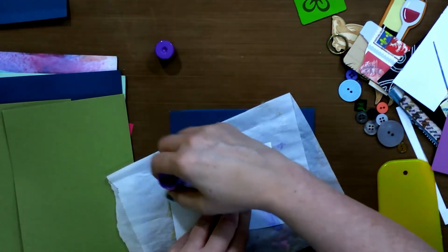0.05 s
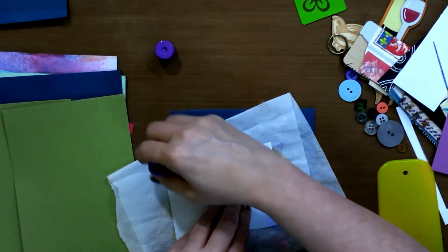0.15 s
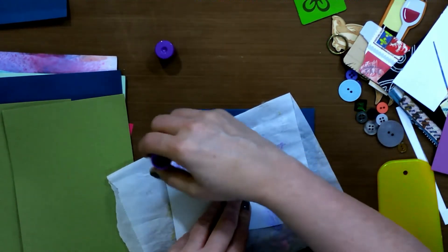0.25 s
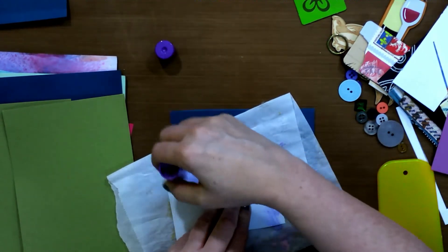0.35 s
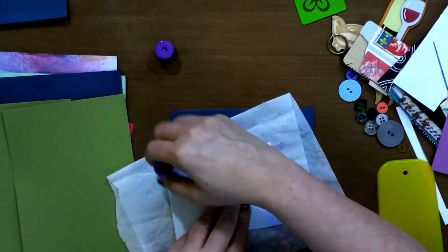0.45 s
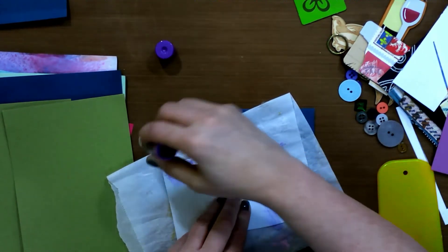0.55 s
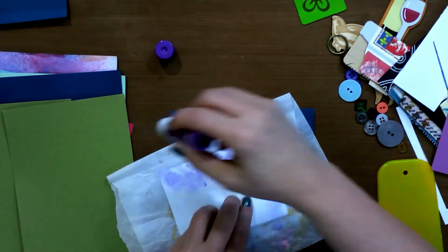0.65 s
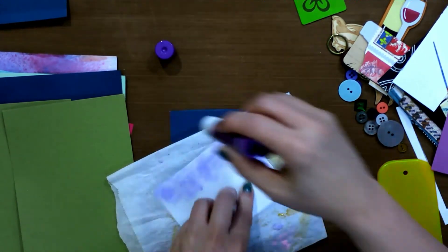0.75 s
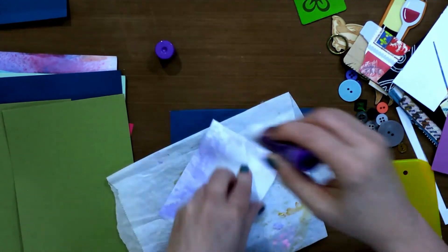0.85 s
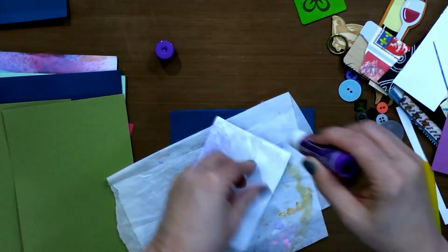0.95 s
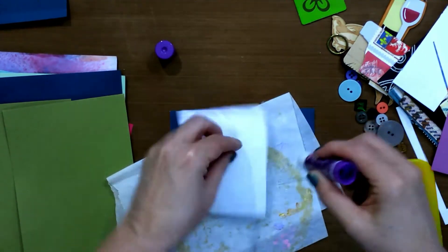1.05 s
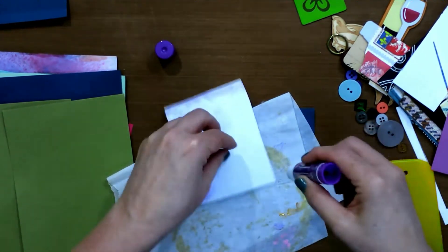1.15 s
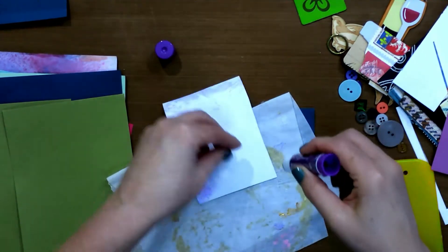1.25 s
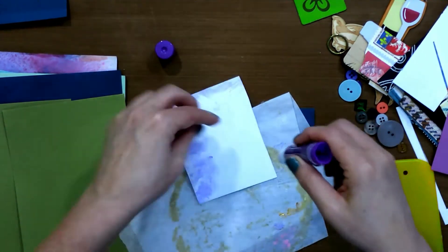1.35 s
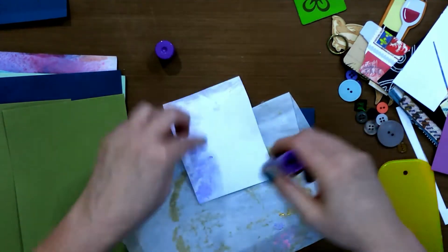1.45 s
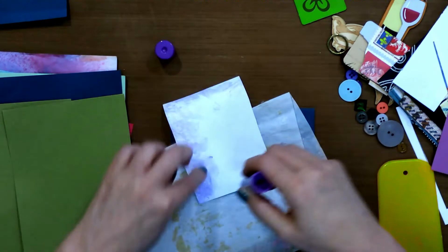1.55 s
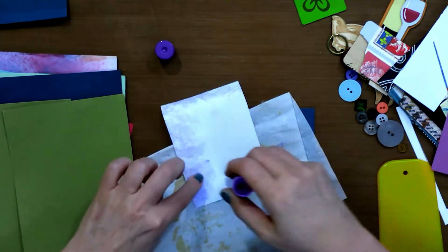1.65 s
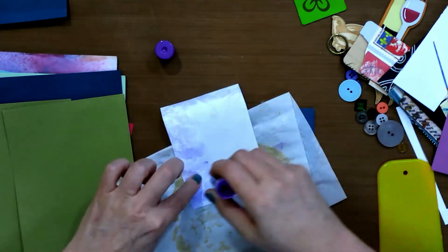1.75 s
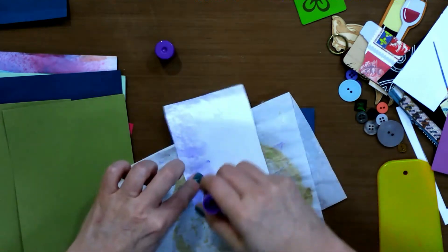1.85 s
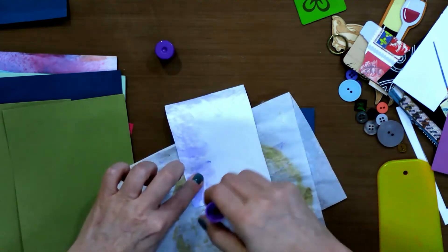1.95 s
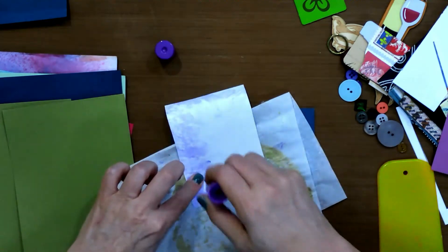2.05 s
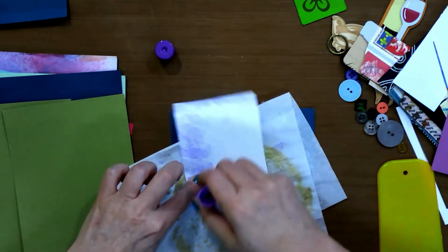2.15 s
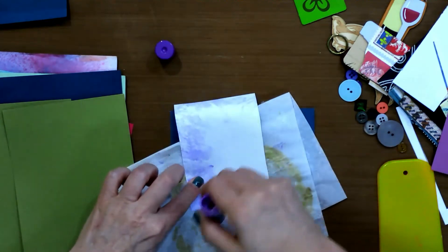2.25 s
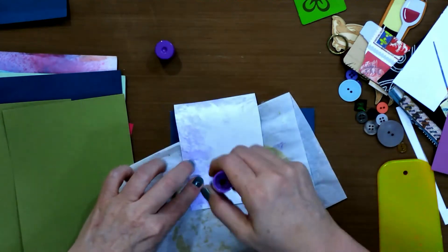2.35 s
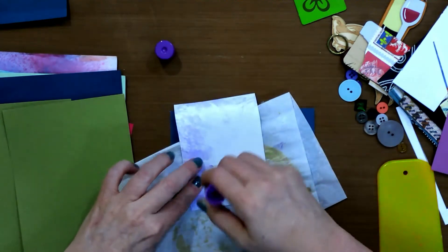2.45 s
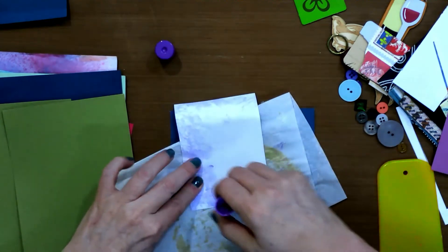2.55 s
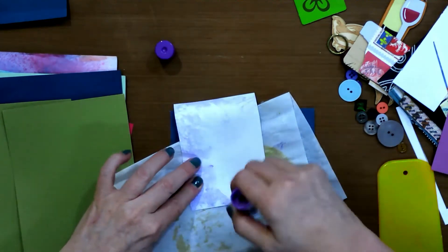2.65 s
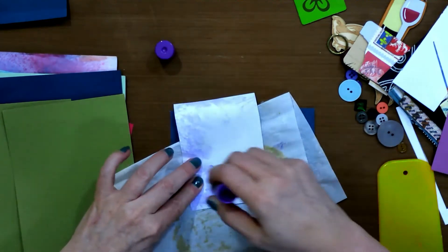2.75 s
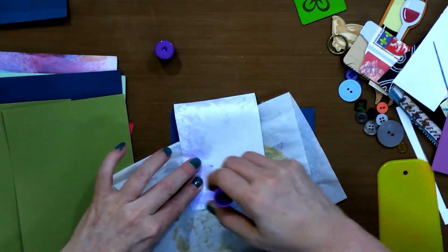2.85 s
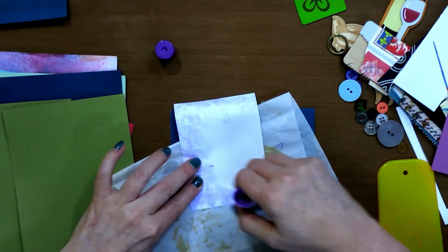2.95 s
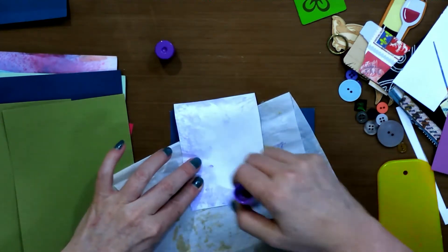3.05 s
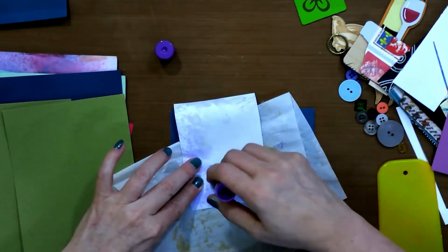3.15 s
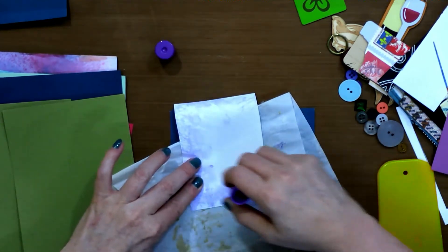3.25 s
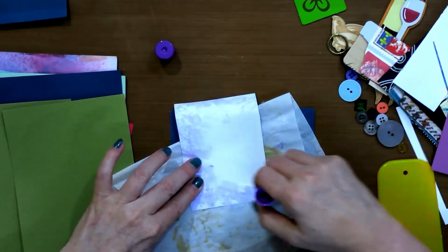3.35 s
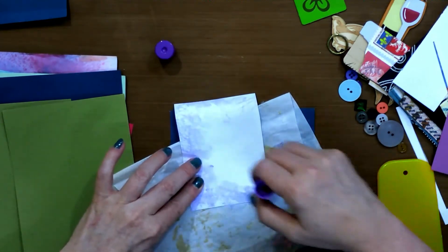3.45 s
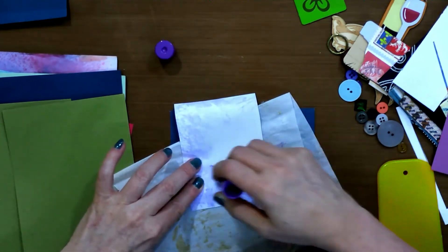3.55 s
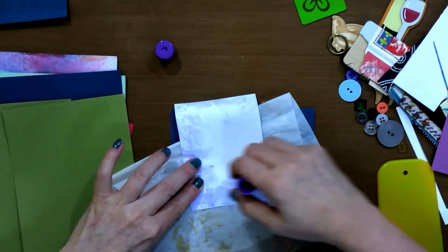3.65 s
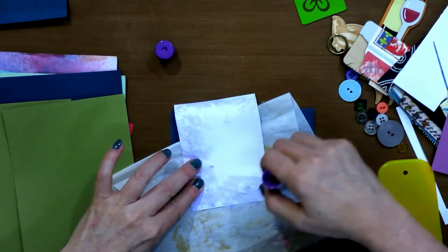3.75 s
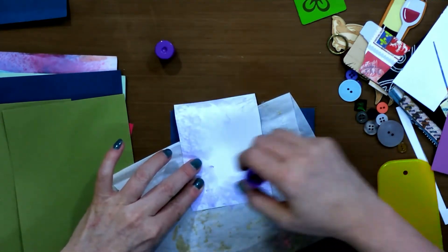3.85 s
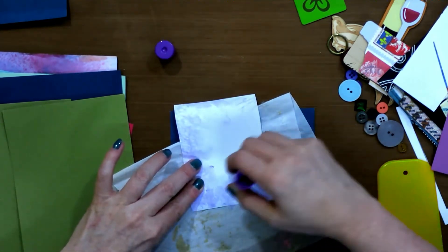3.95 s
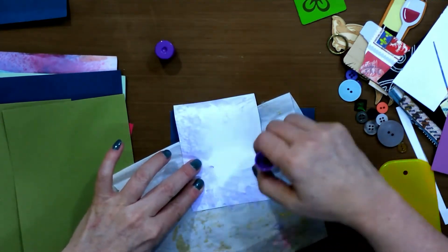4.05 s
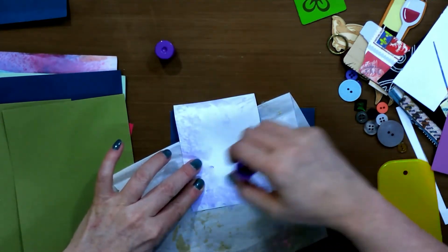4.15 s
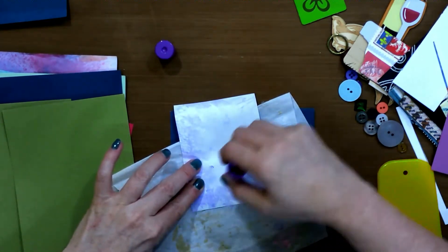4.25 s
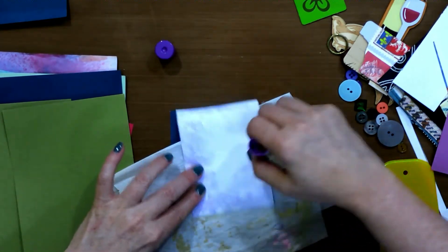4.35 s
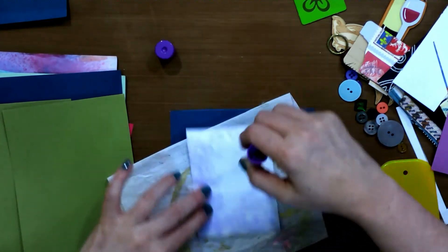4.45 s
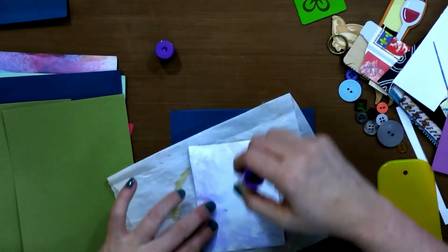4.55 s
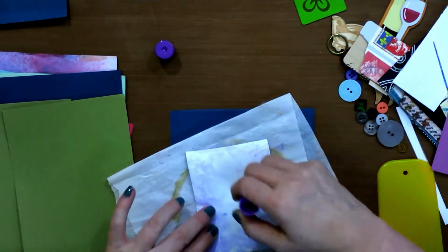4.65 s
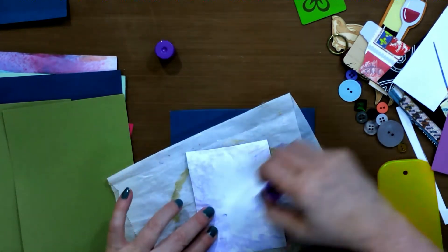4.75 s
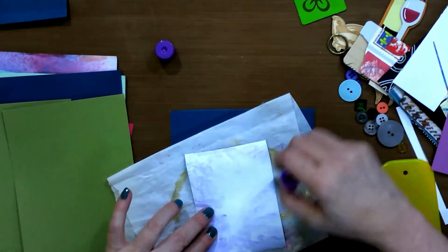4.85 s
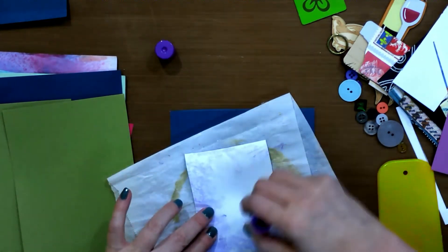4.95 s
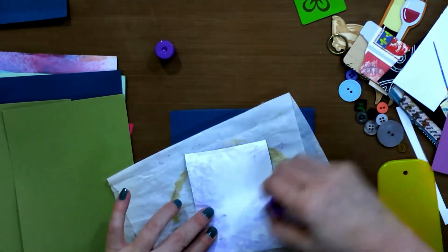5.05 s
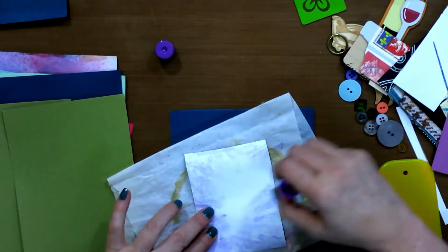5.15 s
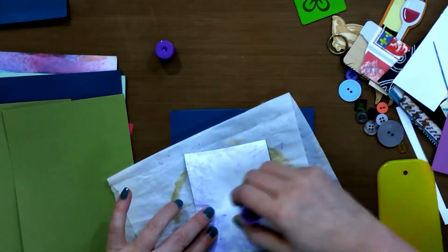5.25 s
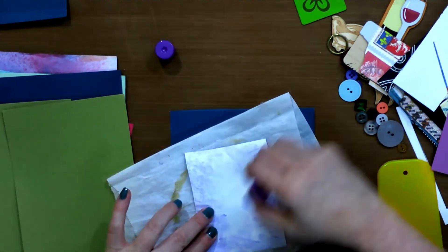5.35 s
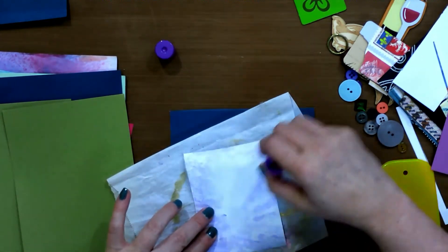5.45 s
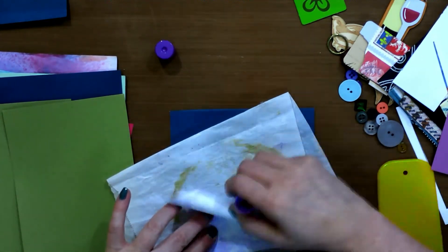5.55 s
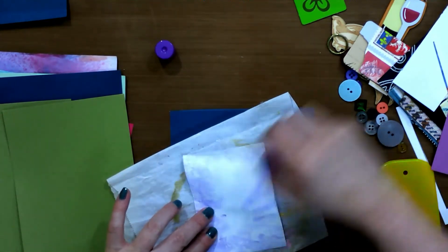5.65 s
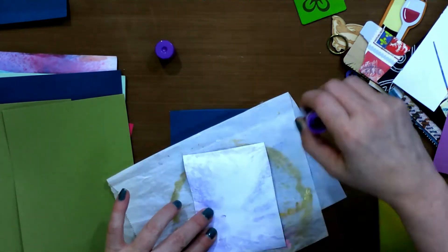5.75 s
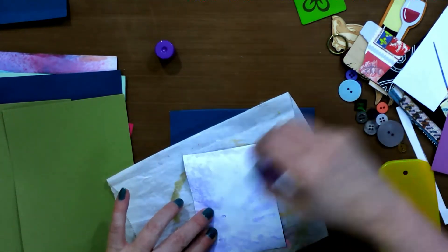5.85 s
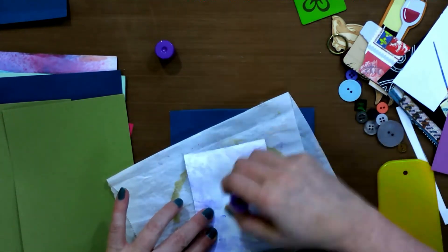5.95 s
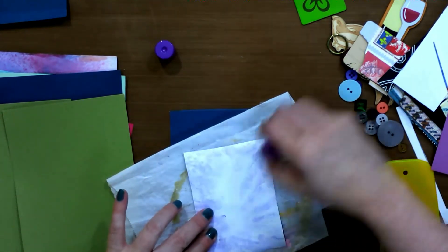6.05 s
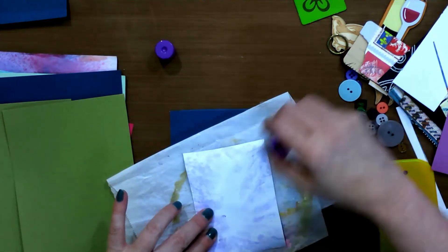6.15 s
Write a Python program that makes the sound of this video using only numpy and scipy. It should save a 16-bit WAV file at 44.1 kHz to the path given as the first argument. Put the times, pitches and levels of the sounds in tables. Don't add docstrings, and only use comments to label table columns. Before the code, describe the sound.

Crisp tissue creases and dry rubbing open the scene, followed by a bright double snap of a loosened sheet. Then hollow, muffled knocks on a wooden desk repeat about every third of a second, with gritty little rubs, peeling ticks and occasional plastic taps between them. Later strokes grow scratchier, with a papery slide and faint squeaks. Close microphone, faint room tone, short indoor reverberation, deep thuddy vibration.

```python
import sys
import numpy as np
from scipy import signal
from scipy.fft import rfft, irfft, next_fast_len
from scipy.io import wavfile
from scipy.ndimage import uniform_filter1d, map_coordinates

SR = 44100
rng = np.random.default_rng(int(sys.argv[2]) if len(sys.argv) > 2 else 0)


def waveform_to_disk(signal):
    frames = np.transpose(np.atleast_2d(signal))
    scaled = np.clip(frames, -1, 1) * 32767
    samples = np.round(scaled).astype(np.int16)
    wavfile.write(sys.argv[1], SR, samples)


def makeup_ratio(level_db):
    decades = np.asarray(level_db, float) / 20
    return 10 ** decades


N = 273682

# f/Hz, level/dB per Hz
AIR_SPECTRUM = [(21, -54), (35, -11), (78, 0), (103, -5), (123, 5), (167, -16), (389, -17), (503, -8.5),
                (602, -20.5), (1170, -18), (1330, -20.5), (1680, -24.5), (2400, -28.5), (3350, -30),
                (16000, -41.5)]
# f/Hz, t60/s
WALLS = [(200, 0.5), (2000, 0.48), (5000, 0.36), (12000, 0.17)]
# t/s, slow mode level/dB, fast mode level/dB
SWAY = [(0.0, -77, -53.5), (0.4, -49.5, -48), (0.79, -56, -52), (0.93, -58, -70), (1.47, -73, -71),
        (1.73, -50.5, -78), (2.0, -50, -45), (2.47, -45, -65), (3.14, -47, -51.5), (3.26, -54, -48),
        (3.848, -46, -50.5), (4.3, -70, -44.5), (4.65, -55, -55.5), (4.78, -50.5, -54.5),
        (5.23, -56, -40.5), (5.47, -52, -60.5), (6.11, -56, -45), (6.2, -58, -63)]
SWAY_HZ = [12, 26.4]
# f/Hz, level under the landing/dB, t60/s
JOLTS = [(28.8, -17.5, 0.34), (76, -17, 0.12)]
# t/s, peak level/dB, hardness/dB, weight/dB, scuff level/dB
LANDINGS = [(0.2313, -27, -18.5, -18, -58.5), (1.665, -44.5, -30, -7, -65), (1.953, -24, -17.5, -18, -57.5),
            (2.3046, -24, -19, -17.5, -57.5), (2.6388, -26.3, -29, -15.5, -55.5),
            (2.9936, -27, -22.5, -17.5, -54.5), (3.132, -46.5, -11, -11, -65),
            (3.4198, -31.5, -26, -12.5, -54.5), (3.766, -28, -24, -16.5, -56),
            (4.071, -32, -22, -14.5, -53), (4.5135, -32.5, -24.5, -12, -57.5),
            (4.8174, -24.5, -12, -16, -54), (5.106, -24, -20.5, -16, -54), (5.7805, -24, -17, -14, -49.5),
            (6.127, -21.5, -17, -18.5, -53)]
EARLIER_LANDING = (-0.11, -42, -20, -56, -70)
# f/Hz, level/dB, t60/s, direction of first swing
DESK_MODES = [(95.9, -5, .055, -1), (124.4, -13.6, .26, 1), (158.9, -10.7, .15, 1), (237.4, -17.8, .39, 1),
              (254.1, -17, .45, -1), (272.4, -14.3, .27, 1), (285.3, -10.3, .34, 1), (302.7, -10.5, .14, 1),
              (332.6, -9.6, .18, -1), (370.8, -18.3, .22, -1), (427.2, -6.5, .095, 1), (537, -31, .2, 1),
              (663, -15.6, .038, 1), (847, -23.5, .03, -1)]
# delay/s, level/dB
ECHOES = [(.003, -3.3), (.00833, 11.2), (.0144, -1.9), (.0155, 5.6), (.0271, 6.9), (.0487, -.5),
          (.0568, -3.6)]
# f/Hz, level/dB per Hz
BLOOM_SPECTRUM = [(250, -40), (360, -2), (480, 0), (700, -5), (950, -12), (1400, -45)]
# t/s, peak level/dB
FLAP = [
    (.9871, -19.3),
    (.9889, -28),
    (.9922, -40),
    (.9953, -30),
    (.9981, -31),
]
# f/Hz, width/Hz, level/dB
SHEET_MODES = [(430, 120, -8), (1070, 81, -12.5), (1400, 300, -3), (1870, 130, -3), (2300, 300, 4),
               (3000, 220, 4), (3400, 200, -2), (4040, 890, -8.5), (6000, 1300, -6)]
# t/s, peak
# level/dB, f/Hz, t60/s
TICKS_AND_RINGS = [(3.5635, -37, 1100, 0.023), (3.5635, -58, 1100, 0.017), (3.5635, -67, 930, 0.013),
                   (1.965, -57, 2370, .2), (1.534, -57, 2500, .06), (.996, -44, 1000, .03),
                   (.6495, -46, 1100, .012), (.775, -50, 1200, .012), (5.7695, -39, 620, .014),
                   (5.7725, -41, 1200, .01), (5.326, -47, 1200, .015), (5.277, -48, 1250, .012)]
# t/s, peak level/dB, dull part level/dB, length/ms
CREASES = [(.02, -17.5, -12, 1.7), (.0605, -40, 0, 1.6), (0.065, -28, 4, 1.5), (0.166, -34, 2, 2.1),
           (0.2517, -34, -21, 2.4), (.258, -33.5, -7, 3.4), (0.3, -20, -25, 0.27), (.305, -31, -11, 1.1),
           (0.3202, -22, -15, 2.5), (.333, -24, -6, 1.4), (0.379, -27.5, -5, 2.8), (0.407, -37, -19, 2.2),
           (.5679, -18, -23, 0.75), (0.6497, -28, 1.5, .3), (0.7532, -29.5, 0, 3.1), (.861, -26, -15, 0.73),
           (1.533, -55.5, 18, 2.9), (1.5806, -26.5, -4.5, 1.7), (1.714, -40, 0, 1.2), (4.158, -32, -2, 2.7),
           (4.173, -24, -6, 0.78), (4.367, -44.5, 16, 0.79), (4.465, -55, 10, 1.4), (4.4846, -31, -12, 1.5),
           (4.5364, -34, -14, .6), (4.544, -37.5, 10.5, 1.2), (4.591, -30, -2.5, 1.2),
           (4.6128, -43.5, 13, 1.2), (4.62, -28, -24, 2), (4.644, -23, -17, 1.1), (5.4842, -25, 6, 2.1)]
# t/s, peak level/dB, dull part level/dB, length/ms
PEELS = [(2.3532, -31, -5, 0.98), (2.3972, -42, -4, 4.5), (2.726, -42, -15, 1.2), (2.799, -32.5, -13, 2.4),
         (2.812, -41.5, 7, 1.7), (3.049, -37, -16, .9), (3.076, -40, -0.5, 2.9), (3.14, -29, -13, 0.6),
         (3.17, -31, -22, .7), (3.1965, -26.5, -15, 1.5), (3.203, -31, -20, 0.85), (3.529, -46, 9, 0.91),
         (3.792, -35, -19, 1.6), (3.8005, -33, -16.5, .9), (3.858, -33, -5, 0.88), (3.8639, -33, -17, 2.4),
         (3.8698, -34, -1, 0.5), (4.0994, -32, -3, 1.7), (4.869, -31, -20, 3.7), (4.901, -38, 5, .84),
         (4.9092, -30, -6, 1.1), (4.927, -19.5, -25, 1.3), (5.1746, -34, -12, .9), (5.1908, -25, -15, .44),
         (5.197, -31.5, -2, 4.3), (5.2479, -35, -1, 3.2), (5.295, -30.5, -2, 2.3), (5.8997, -20.5, -6, 1),
         (5.9122, -18.5, -15, 1.4), (6.171, -35, -27.5, 1)]
# t/s, peak level/dB
FIBRE_TICKS = [(.052, -27), (.292, -44), (0.659, -44), (1.735, -57), (2.454, -53), (2.371, -48),
               (5.111, -28), (3.931, -50), (3.512, -52), (4.559, -50), (3.447, -51), (3.465, -49),
               (3.579, -35), (4.105, -35), (4.575, -49), (4.797, -53), (4.85, -47), (4.8927, -35),
               (4.924, -34), (5.122, -35), (5.16, -40), (5.324, -52), (5.5467, -49), (5.3935, -44),
               (5.442, -31), (5.4535, -30), (5.465, -29), (5.506, -32), (.526, -39), (4.319, -38),
               (4.18, -34)]
# t/s, peak level/dB, f/Hz
PICKS = [(0.0007, -46, 5000), (0.2894, -49, 4800), (0.3094, -34, 8600), (0.5366, -42, 7300),
         (0.659, -40, 3500), (0.7541, -38, 6100), (0.7743, -46, 4600), (0.9656, -57, 4200),
         (1.017, -40, 2900), (1.2935, -59, 3180), (1.32, -67, 4700), (1.5691, -58, 2700),
         (1.7337, -43, 6300), (2.0284, -43.5, 2480), (2.3105, -33, 6600), (2.4313, -54, 2400),
         (2.6166, -68, 5900), (2.635, -52, 3600), (2.7755, -53, 4870), (3.121, -53, 4900),
         (3.1341, -43, 6900), (3.1492, -39.5, 4500), (3.157, -38, 7140), (3.4535, -43, 4300),
         (3.4636, -43, 5300), (3.529, -37.5, 5360), (3.5642, -43, 3700), (3.9419, -51, 6260),
         (4.0858, -47, 3700), (4.1135, -41, 6500), (4.45, -56, 4000), (4.4654, -44, 3800),
         (4.5795, -46, 3600), (4.6488, -40, 5300), (4.7987, -47, 3600), (4.8092, -46, 3200),
         (4.8193, -35.5, 4970), (4.8329, -46, 5200), (4.8532, -37, 6700), (4.8927, -51, 4500),
         (4.898, -42, 6400), (4.901, -34, 6700), (4.9216, -33, 7300), (5.1586, -46, 3400),
         (5.276, -43, 3400), (5.325, -48, 2700), (5.3418, -43, 2500), (5.5452, -38, 2760),
         (5.7901, -36, 4600), (6.1373, -39, 3900), (6.1508, -39, 6300), (6.2037, -38, 7200),
         (2.752, -54, 4000), (2.794, -52, 1500), (2.712, -53, 3500), (1.713, -47, 5200), (1.728, -48, 9200),
         (4.849, -42, 9000), (1.7, -52, 6000), (6.169, -38, 8500)]
# middle t/s, half length/s, f/Hz, level/dB
SQUEAKS = [(5.868, 0.019, 1400, -53.5), (5.888, 0.01, 1150, -50.5), (6.026, 0.042, 1190, -53),
           (6.098, .03, 1250, -63), (5.472, 0.0091, 2230, -46), (5.487, 0.006, 2600, -46)]
# f/Hz, level/dB per Hz
TISSUE_SPECTRUM = [(2350, -35), (4000, -5.5), (7440, 3.5), (9660, -3), (11800, -0.5), (14900, -5),
                   (16000, -2)]
SHEET_SPECTRUM = [(1200, -16), (1800, -2), (2400, -1.5), (3300, 0), (4500, -2), (6500, -16)]
TIP_SPECTRUM = [(300, -4.5), (800, -7), (1150, 0), (1400, -1), (1650, -13.5), (2400, -70)]
HUM_SPECTRUM = [(50, -3), (120, 0.5), (270, -2), (450, -18), (700, -43)]
# start t/s, length/s, level/dB, brightness/dB
RUBS = [(0, 0.03, -50.5, 2.5), (0.053, 0.021, -56, 8.5), (0.216, 0.078, -65, -8),
        (0.296, 0.044, -57.5, -0.5), (0.332, 0.19, -61, 3.5), (0.86, 0.013, -59, -2),
        (0.947, 0.023, -60.5, -1), (1.419, 0.16, -75, -2.5), (1.527, 0.018, -65, -6),
        (1.576, 0.041, -66.5, -3.5), (1.67, 0.066, -67, 0.5), (1.958, 0.066, -61, -1),
        (2.337, 0.085, -69, -5.5), (2.674, 0.15, -72.5, -4), (2.791, .02, -68, -13.5),
        (3.045, 0.079, -73.5, -3), (3.131, 0.076, -60.5, -4.5), (3.446, 0.1, -72, -1),
        (3.559, 0.025, -61.5, -1.5), (3.801, 0.047, -62.5, -0.5), (3.858, 0.022, -59, -1),
        (4.098, 0.16, -63.5, 1), (4.15, 0.034, -54, 3.5), (4.537, 0.12, -61, -6), (4.844, 0.035, -58.5, -4),
        (4.895, 0.037, -56, 1.5), (5.159, 0.18, -61, -6.5), (5.382, 0.012, -50.5, -3),
        (5.427, 0.035, -58.5, 0), (0.087, 0.13, -71, 4.5), (5.84, 0.034, -59, -9.5),
        (5.807, 0.076, -64, 10), (6.157, .06, -60.5, 2.5)]
# start t/s, length/s, level/dB, brightness/dB
TOUCHES = [(3.414, 0.011, -58, 1.5), (3.759, 0.0099, -60, -5), (4.064, 0.0075, -55.5, 2),
           (4.504, 0.0068, -55, -5), (4.798, 0.004, -63, -8), (4.807, .01, -62, -3),
           (5.103, 0.012, -51, -4.5), (5.7675, 0.01, -54.5, -8), (6.1174, 0.0035, -54.5, -21),
           (0.76, 0.02, -59, -1), (2.437, 0.014, -70, -9), (3.447, 0.016, -71, 0), (5.525, .008, -61, -4),
           (5.276, 0.023, -56, -6), (.923, .009, -72, 6), (5.335, .035, -69, -3), (1.62, .04, -72, 2)]
# start t/s, length/s, level/dB, brightness/dB, stick drag/dB
SLIDES = [(0.487, 0.24, -59.5, 8, -1.5), (0.649, 0.051, -51, 1, -26), (0.772, 0.035, -61, 3, -15),
          (4.173, 0.17, -56.5, 4.5, -4), (4.34, .14, -64.5, -5.5, -0.5), (4.659, 0.049, -68.5, 3, -13),
          (5.402, 0.076, -53, 8, -5.5), (5.473, 0.019, -52.5, -12, -1.5), (5.515, 0.094, -78, 10, -11),
          (5.58, 0.21, -72, -5, 1.5), (5.874, 0.046, -51.5, 5, -1), (5.971, 0.17, -76.5, -7, 8.5)]
SETTLE_S = np.array([.014, .03, .035])
# t/s, lines thin out above f/Hz, everything weakened above f/Hz
THINNED = [(.419, 2500, 14500), (.698, 600, 13500), (1.023, 5200, 9000), (1.719, 1500, 12000),
           (1.789, 1500, 6500), (1.859, 1500, 8500), (2.695, 1700, 8500), (3.948, 1700, 8700),
           (4.041, 1500, 4700), (4.413, 1500, 7500), (4.761, 1700, 8700), (5.063, 1500, 11500),
           (5.156, 1500, 5000), (5.226, 1300, 9200), (5.411, 3000, 13000), (5.527, 1000, 8000),
           (5.574, 300, 8000), (5.736, 2000, 7500)]


def unit(x):
    return x / np.sqrt(np.mean(x ** 2) + 1e-20)


def along(points, hz):
    f, v = np.transpose(points)
    return np.interp(np.log(hz + 1), np.log(f + 1), v)


def wobble(rate):
    knots = rng.standard_normal(int(N * rate / SR) + 4)
    return map_coordinates(knots, [np.arange(N) * rate / SR])


def filtered(x, response):
    m = next_fast_len(N + SR // 2)
    return irfft(rfft(x, m) * response(np.fft.rfftfreq(m, 1 / SR)), m)[:N]


def resonance(f, hz, width):
    return 1j * f * width / (hz * hz - f * f + 1j * f * width)


def noise(spectrum):
    return unit(filtered(rng.standard_normal(N), lambda hz: makeup_ratio(along(spectrum, hz))))


def air():
    return makeup_ratio(-64.5 + .8 * wobble(3.1)) * noise(AIR_SPECTRUM)


def room(x):
    hz, t, z = signal.stft(rng.standard_normal(SR // 2), SR, nperseg=256)
    decay = makeup_ratio(-60 * t / along(WALLS, hz)[:, None])
    tail = signal.istft(z * decay, SR, nperseg=256)[1]
    delayed = np.pad(x, (200, 0))
    return signal.fftconvolve(delayed, tail / np.linalg.norm(tail))[:N]


def arm():
    out = np.zeros(N)
    s, *levels = np.transpose(SWAY)
    for hz, level in zip(SWAY_HZ, levels):
        db = np.interp(np.arange(N) / SR, s, level)
        phase = 2 * np.pi * np.cumsum(hz * (1 + 0.03066 * wobble(2.427))) / SR
        out += makeup_ratio(db + 2.5) * np.sin(phase)
    return out


def jolts():
    rise_s = 0.012
    out, t = np.zeros(N + SR), np.arange(SR // 2) / SR
    rise = 1 - np.exp(-(t / rise_s) ** 2)
    shudder = rise * sum(makeup_ratio(db - 60 * t / t60) * np.sin(2 * np.pi * hz * t) for hz, db, t60 in JOLTS)
    for s, db, *_ in LANDINGS:
        out[round(s * SR):][:len(t)] += makeup_ratio(db) * shudder
    return out[:N]


def bloom():
    under_db, t60_s, hardness_share = -30, .45, .3
    s, db, hard_db, *_ = np.transpose(LANDINGS)[:, :, None]
    age = np.maximum(np.arange(N) / SR - s, 0)
    level_db = db + under_db + hardness_share * (hard_db + 20) - 60 * age / t60_s
    swell = (1 - np.exp(-age / .006)) * makeup_ratio(level_db)
    return swell.sum(axis=0) * noise(BLOOM_SPECTRUM)


def thump(u):
    hz, half_s = 292, .003
    return np.cos(2 * np.pi * hz * u) * np.exp(-(u / half_s) ** 2)


def desk():
    thump_db, rise_s = -16.2, .002
    damp_s, damp_db_per_s = .17, 200
    out, t = np.zeros(N + 2 * SR), np.arange(SR // 3) / SR
    contact = t - .0033
    thumps = thump(contact) + sum(makeup_ratio(db) * thump(contact - delay) for delay, db in ECHOES)
    hz, level_db, t60, side = np.transpose(DESK_MODES)[:, :, None]
    rise = 1 - np.exp(-(t / rise_s) ** 2)
    decay_db = 60 * t / t60 + damp_db_per_s * np.maximum(t - damp_s, 0)
    modes = side * rise * makeup_ratio(level_db - decay_db) * np.cos(2 * np.pi * hz * contact)
    for s, db, hard_db, heavy_db, _ in [EARLIER_LANDING] + LANDINGS:
        tilt_db = (hard_db + 22.5) * (hz > 480) + (heavy_db + 17.5) * (hz < 190)
        ring = np.sum(makeup_ratio(tilt_db + rng.normal(0, .8, hz.shape)) * modes, axis=0)
        out[SR + round(s * SR):][:len(t)] -= makeup_ratio(db + 0.5) * (ring + makeup_ratio(thump_db) * thumps)
    return out[SR:N + SR]


def tube():
    out = np.zeros(N)
    for s, db, hz, t60 in TICKS_AND_RINGS:
        age = np.maximum(np.arange(N) / SR - s, 0)
        out += makeup_ratio(db - 60 * age / t60) * np.sin(2 * np.pi * hz * age)
    return out


def flap_response(f):
    modes = sum(makeup_ratio(db) * resonance(f, hz, width) for hz, width, db in SHEET_MODES)
    limp = (5500 ** 2 / (5500 ** 2 - f * f + 1.5j * f * 5500)) ** 3
    small = 1j * f / (900 + 1j * f)
    return modes * limp * small


def flap():
    blows = np.zeros(N)
    for s, db in FLAP:
        blows[round(s * SR)] = -makeup_ratio(db)
    return makeup_ratio(21.5) * filtered(blows, flap_response)


def picks():
    decay_ms, width_over_pitch = 3, 0.44
    out, t, f = np.zeros(N + SR), np.arange(512) / SR, np.fft.rfftfreq(512, 1 / SR)
    decay = makeup_ratio(-60 * t / (.001 * decay_ms))
    for s, db, hz in PICKS:
        burst = decay * rng.standard_normal(len(t))
        snap = irfft(rfft(burst) * resonance(f, hz, width_over_pitch * hz))
        out[round(s * SR):][:len(t)] += makeup_ratio(db + 1.0) * snap / np.abs(snap).max()
    return out[:N]


def crackles():
    snap_hz, snap_spread = 8300, .22
    out, t, f = np.zeros(N + SR), np.arange(1024) / SR, np.fft.rfftfreq(1024, 1 / SR)
    crushed = [(s - .001, scuff_db + 18, 3, 3.7) for s, *_, scuff_db in LANDINGS]
    ticks = [(s, db, -9.5, 0.95) for s, db in FIBRE_TICKS]
    for s, db, dull_db, ms in CREASES + PEELS + crushed + ticks:
        hz = snap_hz * np.exp(snap_spread * rng.standard_normal())
        decay = makeup_ratio(-60 * t / (0.0058 * abs(ms)))
        burst = rfft(decay * rng.standard_normal((2, len(t))))
        bright = irfft(burst[0] * resonance(f, hz, 1.45 * hz) ** 2)
        dull = irfft(burst[1] * resonance(f, 2180, 1900))
        snap = bright / np.abs(bright).max() + makeup_ratio(dull_db - 1.0) * dull / np.abs(dull).max()
        out[round(s * SR):][:len(t)] += makeup_ratio(db - 6.0) * snap
    return out[:N]


def squeaks():
    width_hz = 106
    t, out = np.arange(N) / SR, np.zeros(N)
    for s, half_s, hz, db in SQUEAKS:
        song = unit(filtered(rng.standard_normal(N), lambda f: resonance(f, hz, width_hz)))
        out += makeup_ratio(db) * np.exp(-((t - s) / half_s) ** 4) * song
    return out * makeup_ratio(1.1 * wobble(82))


def fibres(spectrum, per_s, spread_db, smooth, clump_db, patchy_db):
    when, size = rng.random(N), rng.exponential(size=N)
    sign, hiss = rng.standard_normal(N), rng.standard_normal(N)
    slips = (when < per_s / SR) * makeup_ratio(np.minimum(spread_db * size, 14)) * sign
    smooth = np.clip(smooth, 0, 1)
    mix = np.sqrt(1 - smooth) * unit(slips) + np.sqrt(smooth) * hiss
    hz, _, z = signal.stft(mix, SR, nperseg=256)
    field = uniform_filter1d(rng.standard_normal(z.shape), size=3, axis=0)
    field = uniform_filter1d(field, size=8, axis=1)
    colour = makeup_ratio(patchy_db * unit(field) + along(spectrum, hz)[:, None])
    mix = signal.istft(z * colour, nperseg=256)[1][:N]
    starts = (rng.random(N) < 90 / SR) * rng.random(N)
    catches = signal.lfilter([1], [1, -np.exp(-1 / (0.005 * SR))], starts)
    return unit(makeup_ratio(clump_db * unit(catches - catches.mean())) * mix)


def pressure(start, length, gains_db, rise_s, release_s):
    settle_db = -7.5
    t = np.arange(0, N, 32) / SR - start[:, None]
    after = np.maximum(t - length[:, None], 0)
    rise = (1 - np.exp(-np.maximum(t, 0) / rise_s)) ** 2
    release = np.exp(-after / release_s)
    power = []
    for db, slow_s in zip(gains_db, SETTLE_S):
        shape = rise * (release + makeup_ratio(2 * settle_db) * np.exp(-after / slow_s))
        power.append(makeup_ratio(2 * db) @ shape)
    return np.repeat(power, 32, axis=1)[:, :N]


def strokes():
    lead_s, scuff_s, scuff_bright_db = 0.0034, 0.0077, -5
    drag_db, drag_dulls = -1.13, 0.76
    scuffs = [(s - lead_s, scuff_s, db, scuff_bright_db) for s, *_, db in LANDINGS]
    s, length, db, bright = np.transpose(RUBS + TOUCHES + scuffs)
    gains_db = [db + bright, db, db + drag_db - drag_dulls * bright]
    power = pressure(s, length, gains_db, rise_s=.002, release_s=0.0018)
    s, length, db, bright, drag = np.transpose(SLIDES)
    power = power + pressure(s, length, [db + bright, db, db + drag], rise_s=0.023, release_s=0.011)
    hiss, rustle, grip = np.sqrt(power)
    tissue = fibres(TISSUE_SPECTRUM, per_s=2500, spread_db=0, smooth=0.9, clump_db=1.2, patchy_db=2)
    sheet = fibres(SHEET_SPECTRUM, per_s=1200, spread_db=7, smooth=0.55, clump_db=1.2, patchy_db=2.3)
    tip = fibres(TIP_SPECTRUM, per_s=900, spread_db=1.5, smooth=0.83, clump_db=1.4, patchy_db=2.2)
    tip = tip + makeup_ratio(-14.5) * noise(HUM_SPECTRUM)
    return hiss * makeup_ratio(0.6) * tissue + rustle * makeup_ratio(0.53) * sheet + grip * tip + squeaks()


def scene():
    snap, crack, tick, blow, rub = flap(), crackles() + picks(), tube(), desk(), strokes()
    sent = makeup_ratio(-8.5) * snap + makeup_ratio(-10) * crack + makeup_ratio(-13) * tick + makeup_ratio(-19) * blow + makeup_ratio(-12.5) * rub
    direct = snap + crack + tick + blow + rub
    return (direct + room(sent) + arm() + jolts() + air() + bloom())[None]


def thin_out(x):
    strong_ratio, strong_db, weak_db = 1.6, 4, -16
    hz, t, z = signal.stft(np.pad(x, (980, 0)), SR, "cosine", nperseg=2048)
    for s, low_hz, top_hz in THINNED:
        k = round((s * SR + 980) / 1024)
        size = np.abs(z[:, k])
        strong = (size > strong_ratio * uniform_filter1d(size, size=120)) & (hz < top_hz)
        z[:, k] *= makeup_ratio(np.where(hz < low_hz, 0, np.where(strong, strong_db, weak_db)))
    return signal.istft(z, SR, "cosine", nperseg=2048)[1][980:][:N]


def top_cut(x):
    return signal.sosfilt(signal.butter(12, 16660, fs=SR, output="sos"), x)


def record(dry):
    limited = filtered(dry[0], lambda hz: makeup_ratio(-22 * (hz > 15800)))
    return top_cut(thin_out(limited)[None])


dry = scene()
out = record(dry)
waveform_to_disk(out)
```